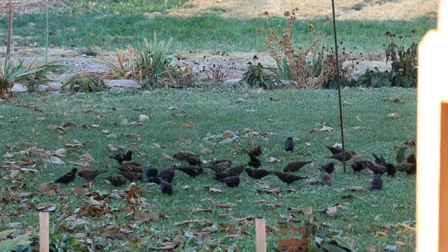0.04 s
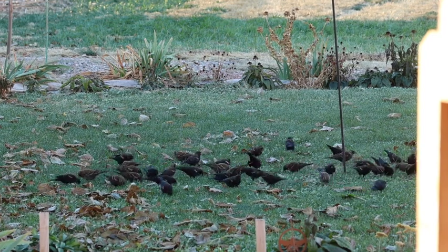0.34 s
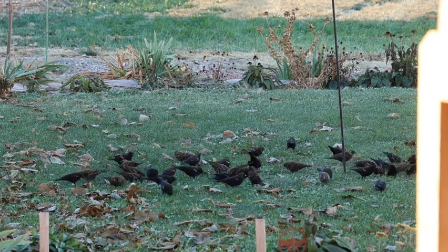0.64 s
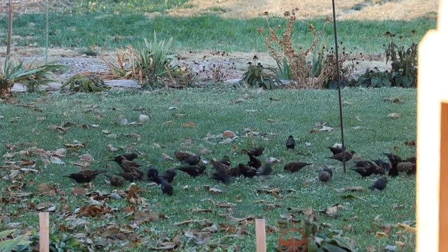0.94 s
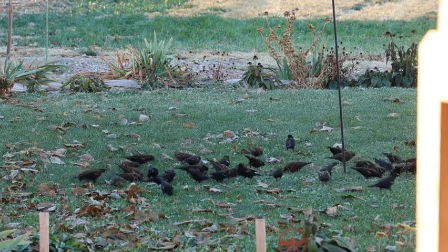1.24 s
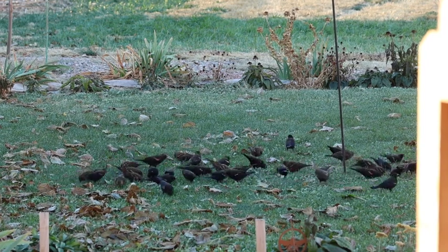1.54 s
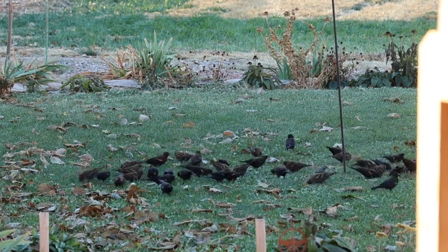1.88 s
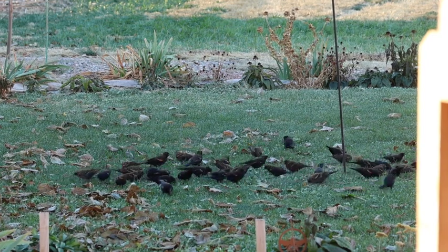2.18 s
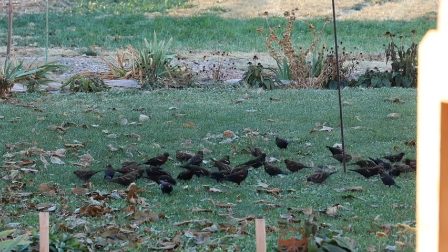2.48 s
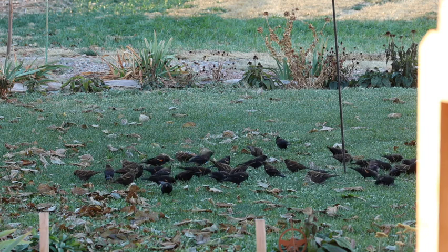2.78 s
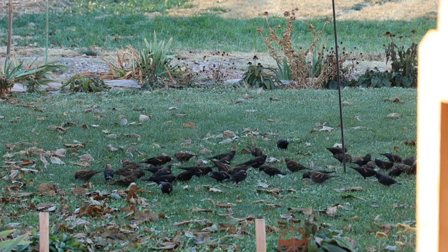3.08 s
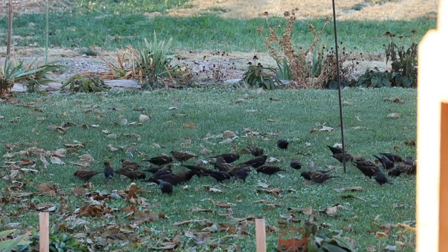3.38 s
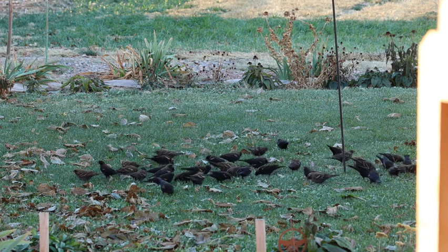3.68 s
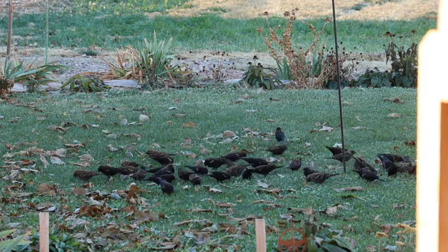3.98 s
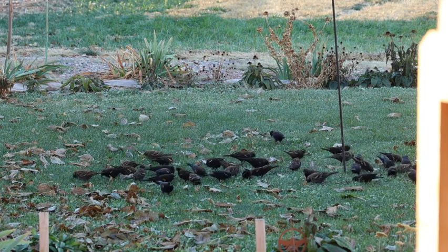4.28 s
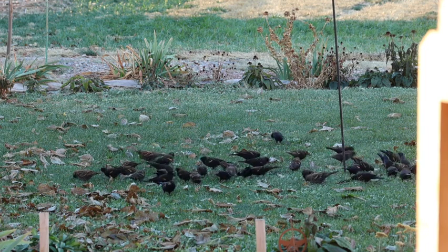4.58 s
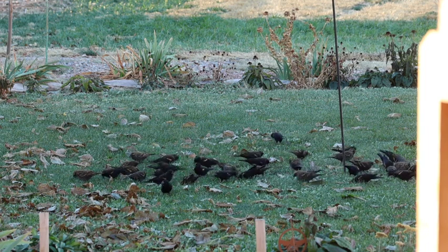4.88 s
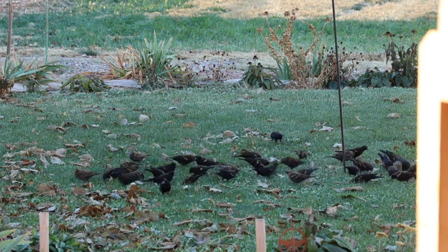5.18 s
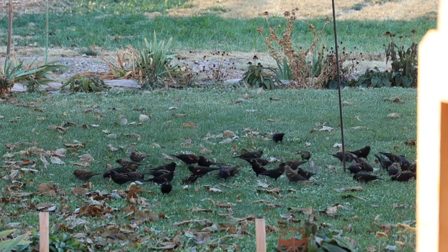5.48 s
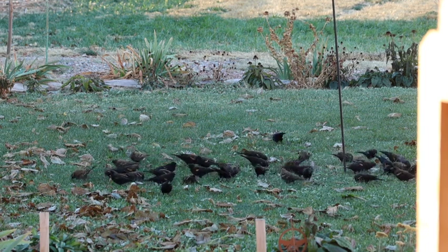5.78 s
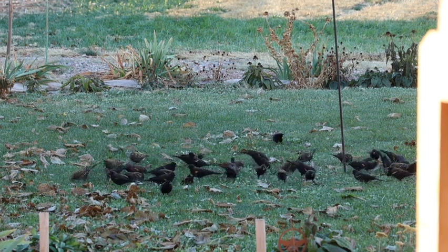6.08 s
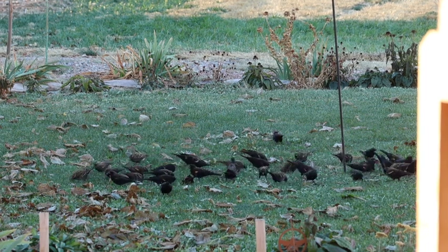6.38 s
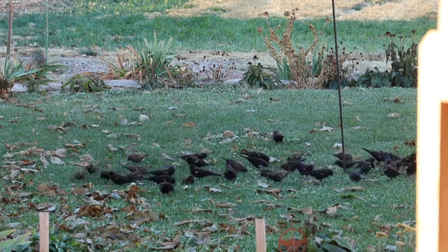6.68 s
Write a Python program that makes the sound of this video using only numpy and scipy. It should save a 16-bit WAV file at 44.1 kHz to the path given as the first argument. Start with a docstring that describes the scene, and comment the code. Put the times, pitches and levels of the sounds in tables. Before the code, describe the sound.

In a quiet back yard, blackbirds call from a little way off with short, sharp chacks, faint peeps and a few nasal notes. Three chacks stand out, two near the middle and the loudest later, before the nasal calls grow more frequent. Light pecks and dry leaf crackles run underneath, along with an occasional faint wind chime ring. Behind it all lies a soft hush, with far traffic rising at the close.

```python
"""A blackbird flock feeds on a leaf-strewn lawn: sharp chacks, each a quick pitch sweep of the syrinx,
echo round the yard with nasal chups, thin whistles and one brief, nearly steady high tone.
Leaves rustle; sharp dry clicks come from the leaves, and one with the loudest chack.
Small metal tubes, like a wind chime, brush together and ring faintly now and then.
Behind lies a soft outdoor hush, with distant road noise that swells at the end."""
import sys
import numpy as np
from scipy import signal
from scipy.fft import rfft, irfft, next_fast_len
from scipy.io import wavfile
from scipy.ndimage import uniform_filter1d, map_coordinates

SR = 44100
rng = np.random.default_rng(int(sys.argv[2]) if len(sys.argv) > 2 else 0)


def dump_mix(stems):
    """Bounce the given channels to the path in sys.argv[1] as a 16-bit WAV at rate SR."""
    frames = np.atleast_2d(stems).T  # one column per channel
    limited = np.clip(frames, -1, 1)  # hard clip at full scale
    pcm = np.round(limited * 32767).astype(np.int16)
    wavfile.write(sys.argv[1], SR, pcm)


N = 306054

# spectrum of dry clicks and pecks: freq_hz, density_db
CLICK_SPECTRUM = [(1500, -14), (4500, 1), (8000, 8), (12000, -0.5), (16000, 0)]


def amp(db):
    """Decibels to gain."""
    return 10 ** (np.asarray(db) / 20)


def unit(x):
    """Scale to rms 1."""
    return x / np.sqrt(np.mean(x ** 2) + 1e-20)


def along(points, hz):
    """Interpolate (freq_hz, value) points on a log axis."""
    freq_hz, values = np.transpose(points)
    return np.interp(np.log(hz + 1), np.log(freq_hz + 1), values)


def clock(length_s):
    """Sample times in seconds."""
    return np.arange(int(length_s * SR)) / SR


def wobble(rate_hz, size=N):
    """Smooth random curve, rate_hz knots a second."""
    knots = rng.standard_normal(int(size * rate_hz / SR) + 4)
    return map_coordinates(knots, [np.arange(size) * rate_hz / SR])


def phase_rad(pitch_hz):
    """Running phase of a pitch curve."""
    return 2 * np.pi * np.cumsum(pitch_hz) / SR


def add(track, start_s, x):
    """Mix x into the track."""
    start = max(round(start_s * SR), 0)
    track[..., start:start + x.shape[-1]] += x[..., :N - start]


def filtered(x, response):
    """Apply a gain given as a function of frequency."""
    size = x.shape[-1]
    padded = next_fast_len(size + 2 ** 12)
    return irfft(rfft(x, padded) * response(np.fft.rfftfreq(padded, 1 / SR)), padded)[..., :size]


def coloured(x, spectrum):
    """Shape x by (freq_hz, gain_db) points; rms 1."""
    return unit(filtered(x, lambda hz: amp(along(spectrum, hz))))


def resonant(modes, hz):
    """Gain of power-summed resonances."""
    return np.sqrt(sum(abs(amp(db) * hz * width_hz / (centre_hz ** 2 - hz ** 2 + 1j * hz * width_hz)) ** 2
                       for centre_hz, width_hz, db in modes))


def air(response):
    """Stereo noise of rms 1, near mono in the bass, wide in the treble."""
    # left-right likeness: freq_hz, correlation
    likeness = [(60, 0.97), (150, 0.79), (380, 0.78), (950, 0.96), (2380, 0.72), (5980, 0.41),
                (15000, -0.65)]

    def mid_side_gain(hz):
        angle_rad = np.arccos(np.clip(along(likeness, hz), -1, 1)) / 2
        return response(hz) * np.array([np.cos(angle_rad), np.sin(angle_rad)])

    mid, side = filtered(rng.standard_normal((2, N)), mid_side_gain)
    return unit(np.array([mid + side, mid - side]))


def yard(x, wet_db, width=0.26, linger=1, lumpy_db=4, rise_s=0.004):
    """Add a stereo echo, arriving in lumps from fences, walls and shrubs."""
    # echo decay, scaled by linger: freq_hz, t60_s
    decay_times = [(500, 0.47), (3000, 0.29), (10000, 0.083)]
    lumps = rng.standard_normal((2, SR // 2)) * amp(lumpy_db * wobble(1500, SR // 2))
    hz, t, bands = signal.stft(lumps, SR, nperseg=256)
    decay = amp(-60 * t / (linger * along(decay_times, hz)[:, None])) * (1 - np.exp(-t / rise_s))
    mid, side = signal.istft(bands * decay, SR, nperseg=256)[1]
    impulse = np.array([mid + width * side, mid - width * side])
    impulse *= amp(wet_db) / np.linalg.norm(impulse[0])
    impulse[:, 0] += 1  # direct path
    return signal.fftconvolve(x[None], impulse, axes=1)


def outdoors(hush_db=-53.92, flock_db=-66):
    """Soft hush, blurred murmur of far birds, puffs of air on the microphone."""
    # spectra: freq_hz, density_db
    hush_spectrum = [(13, -47), (22, -33), (64, 0.5), (97, -0.5), (172, -1), (275, -3.5), (315, -8.5),
                     (502, -3.5), (717, -4), (869, -3), (1080, -8), (2910, -15), (4510, -12.5), (6100, -18),
                     (15500, -27)]
    flock_spectrum = [(1200, -39), (2200, -2), (3000, 5), (4200, 3), (5200, -16), (7000, -26), (12000, -40)]
    puff_spectrum = [(15, -20), (30, -22), (55, 4), (80, 0), (130, -32), (400, -90)]
    # air puffs: start_s, length_s, level_db
    puffs = [(1.449, 0.38, -59.5), (5.144, 0.091, -49), (5.203, 0.11, -53)]
    out = amp(hush_db + 1.87 * wobble(3.3)) * air(lambda hz: amp(along(hush_spectrum, hz)))
    out += amp(flock_db + 0.73 * wobble(12)) * air(lambda hz: amp(along(flock_spectrum, hz)))
    for start_s, length_s, level_db in puffs:
        u = clock(length_s) / length_s
        puff = coloured(rng.standard_normal(len(u)), puff_spectrum)
        add(out, start_s, amp(level_db) * np.sin(np.pi * u) * puff)
    return out


def road(steady_body_db=-67, steady_whine_db=-71, drone_db=-67, dull_hz=2100):
    """Far tyre noise swells and fades, hollow and dulled by distance, over a faint engine drone."""
    # traffic swells: centre_s, half_width_s, body_db, whine_db
    swells = [(0.093, 0.1, -61, -62), (2.845, 0.33, -58, -54.5), (4.346, 0.24, -60.5, -58.5),
              (6.844, 0.44, -46.5, -47.5)]
    # resonances of road noise, tyre whine and engine: centre_hz, width_hz, gain_db
    body_modes = [(206, 180, -11.5), (492, 40, -2), (826, 230, -4.5), (1220, 2100, -11), (1610, 86, -5)]
    whine_modes = [(1267, 70, 0)]
    drone_modes = [(65, 46, -8), (121, 11, -0.5)]

    def far(modes):
        return air(lambda hz: resonant(modes, hz) / np.sqrt(1 + (hz / dull_hz) ** 4))

    centre_s, half_width_s, body_db, whine_db = np.transpose(swells)
    envelopes = np.exp(-((np.arange(N)[:, None] / SR - centre_s) / half_width_s) ** 2)
    drone = amp(drone_db + 4 * wobble(1.82)) * far(drone_modes)
    body = np.hypot(amp(steady_body_db), envelopes @ amp(body_db)) * far(body_modes)
    whine = np.hypot(amp(steady_whine_db), envelopes @ amp(whine_db)) * far(whine_modes)
    return body + whine + drone


def pecks(floor_db=-68, spread_db=6, crumple_db=4, length_s=0.04, count=70):
    """Small pecks at random times, each a soft crunch of leaves."""
    out, u = np.zeros((2, N)), clock(length_s) / length_s
    envelope = np.sin(np.pi * np.sqrt(u))
    for when, force in rng.random((count, 2)):
        grains = rng.standard_normal((2, len(u))) * amp(crumple_db * wobble(910, len(u)))
        crunch = envelope * coloured(grains, CLICK_SPECTRUM)
        add(out, when * N / SR, amp(floor_db + spread_db * force ** 2) * crunch)
    return out


def leaves(spiky_db=3, whisper_db=-75, swing_db=3):
    """Dry leaves crackle when stirred and whisper under many small feet."""
    # stirs by feet and wings: start_s, length_s, level_db
    rustles = [(0.047, 0.1, -58.5), (0.832, 0.052, -60), (1.175, .13, -66), (1.734, 0.079, -53.5),
               (2.007, .079, -61), (2.043, .07, -47.5), (2.095, 0.074, -51.5), (2.256, 0.072, -59),
               (2.975, 0.045, -69), (3.205, 0.039, -57), (3.28, 0.14, -56.5), (3.38, 0.059, -61),
               (3.889, 0.13, -56.5), (4.121, 0.072, -54.5), (4.26, 0.057, -60), (4.478, 0.072, -60.5),
               (4.808, .04, -58), (5.28, 0.084, -53), (5.505, 0.025, -49), (5.671, 0.098, -48.5),
               (6.03, .09, -65), (6.202, 0.076, -57), (6.846, 0.055, -57)]
    # spectra: freq_hz, density_db
    rustle_spectrum = [(1500, -11), (3500, 5.5), (5500, 5.5), (9000, -2.5), (13000, -9), (16000, -39)]
    whisper_spectrum = [(1500, -18), (3500, 2), (5500, 8), (9000, -4.5), (13000, -14.5), (16000, -22)]
    out = np.zeros((2, N))
    for start_s, length_s, level_db in rustles:
        u = clock(length_s) / length_s
        grains = rng.standard_normal((2, len(u))) * amp(spiky_db * wobble(2200, len(u)))
        add(out, start_s, amp(level_db) * coloured(grains, rustle_spectrum) * np.sin(np.pi * u ** 0.57))
    feet = unit(amp(swing_db * (wobble(6.9) + wobble(250))))
    return out + amp(whisper_db) * feet * air(lambda hz: amp(along(whisper_spectrum, hz)))


def clicks(t60_s=0.017, rise_s=0.00081, rough_db=4):
    """Sharp dry clicks, from leaves and one with the loudest chack."""
    # clicks: start_s, level_db
    ticks = [(1.1887, -51), (1.737, -39.5), (4.1273, -51), (4.816, -47), (5.507, -49), (5.6077, -48.5),
             (5.7957, -49), (6.3287, -45), (6.8425, -41)]
    out, t = np.zeros((2, N)), clock(0.046)
    for start_s, level_db in ticks:
        burst = coloured(rng.standard_normal((2, len(t))), CLICK_SPECTRUM)
        burst *= unit(amp(rough_db * wobble(700, len(t))))
        add(out, start_s, amp(level_db - 60 * t / t60_s) * np.minimum(t / rise_s, 1) * burst)
    return out


def chime(wet_db=-11, overtone_t60_s=0.29, sway_db=2, rattle_rad=0.4, damp_s=0.047):
    """Light metal tubes brush: a split bending mode swells roughly in contact, drops, then rings away."""
    # modes by tube: bending_hz, twin_hz, overtone_hz
    modes_hz = {"long": (3309, 3345, 8626), "mid": (3885, 3925, 10120), "short": (4458, 4517, 11591),
                "tiny": (5457, 5388, 14200)}
    # ring by tube: t60_s, overtone_db
    ringing = {"long": (0.18, -2), "mid": (0.3, -30), "short": (1.25, -22.5), "tiny": (0.31, -45)}
    # contacts: start_s, tube, swell_s, level_db, twin_db, damping_db
    touches = [(.329, "long", .018, -59.5, 1, 4.5), (.625, "tiny", .021, -55, -10, -1),
               (.78, "short", 0.013, -48, -4, 11), (.82, "short", 0.021, -44, -13, 4.5),
               (.96, "mid", 0.013, -53.5, -15, 8), (1.346, "tiny", 0.024, -45.5, -5.5, 8),
               (1.9, "short", 0.011, -49, -8, 5), (1.95, "short", 0.019, -49, -6, 9),
               (2.24, "long", .019, -53, -20, 7), (3.143, "tiny", 0.032, -55, -2, 4.5),
               (3.73, "short", .15, -61.5, 7, 17), (3.87, "mid", .035, -56, -4, 3),
               (4.243, "tiny", .041, -51, -10, 1), (6.01, "long", .025, -62, -10, 6),
               (6.468, "short", .025, -63, 9, 4.5)]
    out, t = np.zeros((2, N)), clock(1)
    for start_s, tube, swell_s, level_db, twin_db, damping_db in touches:
        t60_s, overtone_db = ringing[tube]
        free_s = np.maximum(t - swell_s - 0.02, 0)  # time since the tubes parted
        contact = np.exp(-free_s / damp_s)
        partials = []
        for hz in modes_hz[tube]:
            phase = 2 * np.pi * (hz * t + rng.random()) + rattle_rad * contact * wobble(161, len(t))
            partials.append(np.sin(phase) * amp(sway_db * wobble(25.7, len(t))))
        bending, twin, overtone = partials
        ring = bending + amp(twin_db) * twin + amp(overtone_db - 60 * free_s / overtone_t60_s) * overtone
        envelope = np.minimum(t / swell_s, 1) * amp(-60 * free_s / t60_s - damping_db * (1 - contact))
        add(out, start_s, amp(level_db) * yard(ring * envelope, wet_db, width=1))
    return out


def peeps(floor_db=-66, spread_db=4, jitter=0.0496, wet_db=5, length_s=0.03, count=70):
    """Faint buzzy peeps from the rest of the flock, at random times, mostly echo."""
    out, u = np.zeros(N), clock(length_s) / length_s
    for when, height, slope, force in rng.random((count, 4)):
        glide = 0.206 * (slope - 0.7) * u
        pitch_hz = (2900 + 2300 * height) * (1 + glide + jitter * wobble(581, len(u)))
        peep = np.sin(np.pi * u) * np.sin(phase_rad(pitch_hz))
        add(out, when * N / SR, amp(floor_db + spread_db * force) * peep)
    return yard(out, wet_db)[:, :N]


def thin_tones(wet_db=1, jitter=0.038):
    """Thin whistles and one brief, nearly steady high tone, smeared by echo."""
    # tones: start_s, length_s, from_hz, to_hz, level_db
    tones = [(.035, .04, 4420, 4130, -56), (2.665, .024, 3760, 3640, -54), (3.103, .053, 7100, 8460, -60),
             (3.55, .021, 3950, 3830, -46), (3.82, .06, 5220, 4500, -56), (5.416, 0.019, 4200, 3940, -55),
             (5.584, 0.076, 5340, 4750, -54), (5.605, .056, 4200, 3900, -56),
             (6.548, 0.047, 5050, 4430, -52.5)]
    out = np.zeros((2, N))
    for start_s, length_s, from_hz, to_hz, level_db in tones:
        u = clock(length_s) / length_s
        pitch_hz = (from_hz + (to_hz - from_hz) * u) * (1 + jitter * wobble(710, len(u)))
        tone = np.sin(np.pi * u) * np.sin(phase_rad(pitch_hz))
        add(out, start_s, amp(level_db) * yard(tone, wet_db, width=0.48))
    return out


def chups(gain_db=1, shimmer_db=2.5, fourth_db=-2):
    """Hoarse nasal calls; the throat favours harmonic 2. The falling ones come from farther off."""
    # nasal calls: start_s, kind, length_s, middle_hz, level_db, upper_harmonics_db
    calls = [(0.034, "level", 0.067, 1051, -41, -23), (1.566, "level", 0.056, 1008, -43, -20),
             (1.721, "falling", 0.046, 1277, -47, -10), (2.261, "falling", .032, 1560, -53.5, -16),
             (2.804, "falling", 0.056, 1334, -48.5, -24), (3.524, "falling", .04, 1564, -50, -23),
             (5.92, "falling", 0.04, 1455, -45, -19), (5.981, "arched", 0.065, 982, -37.5, -25),
             (6.072, "falling", 0.0703, 1326, -46.5, -10.5), (6.231, "falling", 0.049, 1425, -46.5, -12.5),
             (6.459, "arched", .069, 977, -37.5, -24), (6.585, "falling", 0.063, 1373, -47, -9.5),
             (6.771, "falling", 0.058, 1316, -50.5, -7.5)]
    # voice by kind: start_ratio, end_ratio, fundamental_db, breath_db, wet_db
    voices = {"level": (.93, .91, -18.5, -21, -10), "arched": (.81, .83, -21, -23, -11),
              "falling": (1.05, .94, -7, -19, -4.5)}
    # hoarseness by kind: jitter_ratio
    jitter = {"level": .028, "arched": .032, "falling": .027}
    # breath noise: freq_hz, density_db
    breath_spectrum = [(700, -31), (1400, -8), (2700, 7), (3400, 0), (5300, 4), (7000, -15), (14000, -38)]
    out = np.zeros((2, N))
    for start_s, kind, length_s, middle_hz, level_db, upper_db in calls:
        start_ratio, end_ratio, fundamental_db, breath_db, wet_db = voices[kind]
        u = clock(length_s) / length_s
        arch = np.polyval(np.polyfit([0, 0.5, 1], [start_ratio, 1, end_ratio], 2), u)
        phase = phase_rad(middle_hz * arch * (1 + jitter[kind] * wobble(697, len(u))))
        upper = np.sin(3 * phase) + amp(fourth_db) * np.sin(4 * phase)
        tone = amp(fundamental_db) * np.sin(phase) + np.sin(2 * phase) + amp(upper_db) * upper
        breath = amp(breath_db) * coloured(rng.standard_normal(len(u)), breath_spectrum)
        breath *= 1 + np.sin(phase)  # one pulse of air a cycle
        effort = np.abs(np.sin(np.pi * u ** 0.94)) ** 0.85 * amp(shimmer_db * wobble(308, len(u)))
        add(out, start_s, amp(level_db + gain_db) * yard(effort * (tone + breath), wet_db, linger=0.7))
    return out


def chack(top_hz, depth, length_s, second_db, rasp_db, jitter=0.032, flutter_db=2, rasp_s=0.028):
    """One very quick up-and-down sweep of the syrinx, then a falling stroke and a rasp."""
    # pitch contour, raised to the power depth: length_share, pitch_ratio
    sweep = [(0, .56), (.15, .82), (.35, 1.02), (.56, .92), (.8, .69), (1, .47)]
    # rasp noise: freq_hz, density_db
    rasp_spectrum = [(600, -15.5), (1200, -3), (1600, -2), (2000, -0.5), (2500, 5), (3000, 6), (3400, -1),
                     (4000, -19.5), (5300, -12), (7500, -35), (14000, -42)]
    u = clock(length_s) / length_s
    envelope = np.abs(np.sin(np.pi * u ** 1.3)) ** 0.95 * amp(flutter_db * wobble(497, len(u)))

    def stroke(ratio):
        return envelope * np.sin(phase_rad(top_hz * ratio * (1 + jitter * wobble(1520, len(u)))))

    call = np.zeros(SR // 10)
    add(call, 0, stroke(np.interp(u, *np.transpose(sweep)) ** depth))
    add(call, 0.66 * length_s, amp(second_db) * stroke(np.interp(u, [0, 1], [1.55, 0.689])))
    rasp_envelope = np.sin(np.pi * np.sqrt(clock(rasp_s) / rasp_s))
    rasp = rasp_envelope * coloured(rng.standard_normal(len(rasp_envelope)), rasp_spectrum)
    add(call, 0.7 * length_s, amp(rasp_db) * rasp)
    return call


def walls(call, bounce_s, bounce_db):
    """Nearby walls double a call: its own bounce plus a common set of reflections."""
    # reflections: delay_s, gain_db
    reflections = [(.0028, -14.5), (0.0135, -14), (0.0167, -15.5), (.024, -16.5), (0.0347, -15)]
    impulse = np.zeros(SR // 20)
    impulse[0] = 1
    for delay_s, gain_db in [(bounce_s, bounce_db)] + reflections:
        impulse[int(delay_s * SR + rng.normal(0, 1))] += amp(gain_db)
    return signal.fftconvolve(call, impulse)


def chacks(gain_db=0.98, full_db=-22.5, near_db=-20, left_bias_db=1.2):
    """Sharp contact calls; fainter ones are raspier, farther off and carry more echo."""
    # contact calls: start_s, level_db, top_hz, sweep_depth, length_s, second_db, bounce_s, bounce_db
    calls = [(0.08, -48, 3860, .7, 0.01, 2, .006, -9), (.287, -56, 3130, .94, 0.011, -14, 0.0067, -9),
             (0.771, -37, 3065, 1.02, 0.013, 1, 0.019, -8.5),
             (1.618, -43.5, 2840, 0.97, .012, -8, 0.009, -3),
             (1.901, -47.5, 3120, 0.92, 0.013, -13, 0.0052, -7),
             (2.054, -39.5, 3400, 0.84, 0.011, -20, 0.0097, -11),
             (2.4, -53.5, 3120, 0.86, 0.013, -14, 0.0066, -7),
             (2.656, -45.5, 3740, 0.52, .012, -16, .01, -6), (2.977, -40, 3105, 0.86, 0.014, -10, .011, -5),
             (3.205, -22.5, 3170, 1.07, .014, -17, 0.0086, -5),
             (3.524, -44, 2903, 1.44, 0.015, -15, 0.0077, -7),
             (3.57, -23.5, 2986, 0.75, 0.011, -31, 0.0063, -4),
             (3.913, -42.5, 3163, 0.81, 0.012, -12, 0.007, -8),
             (4.228, -45.5, 3180, .85, .013, -8, 0.0067, -5),
             (4.351, -40.5, 2980, 0.85, .012, -14, .008, -4),
             (4.37, -39, 3007, 1.02, .012, -10, 0.0072, -17),
             (5.318, -51, 3126, 1.33, .012, -2, 0.0056, -11),
             (5.465, -46.5, 3210, 1.2, 0.013, -5, .006, -1),
             (5.501, -17, 3060, 0.57, .0125, -25, 0.0076, -3.5),
             (5.652, -31.5, 3183, 1.05, 0.014, -13, 0.0083, -2.5),
             (6.046, -40, 3186, 0.99, .012, -21, .012, -2),
             (6.125, -47, 2824, 1.1, 0.012, -22, 0.0053, -14),
             (6.791, -43.5, 2854, 0.77, 0.011, -11, .008, -7)]
    out = np.zeros((2, N))
    for start_s, level_db, top_hz, depth, length_s, second_db, bounce_s, bounce_db in calls:
        rasp_db = min(-18 + 1.2 * (full_db - level_db), -12.5)
        wet_db = -12 + 0.39 * (near_db - level_db)
        direct = chack(top_hz, depth, length_s, second_db, rasp_db)
        call = yard(walls(direct, bounce_s, bounce_db), wet_db, width=0.42, lumpy_db=5.5)
        peak = np.sqrt(uniform_filter1d(call[0] ** 2, size=200).max() * 2)
        add(out, start_s, amp(level_db + gain_db) * call / peak)
    return out * amp([[left_bias_db / 2], [-left_bias_db / 2]])


def scene():
    """Calls, tones, clicks and leaves over the outdoor background."""
    pitched = chacks() + chups() + thin_tones() + peeps() + chime()
    return pitched + clicks() + leaves() + pecks() + outdoors() + road()


def record(dry, cutoff_hz=15730):
    """Brick-wall low-pass."""
    return filtered(dry, lambda hz: hz < cutoff_hz)


dry = scene()
out = record(dry)
dump_mix(out)
```